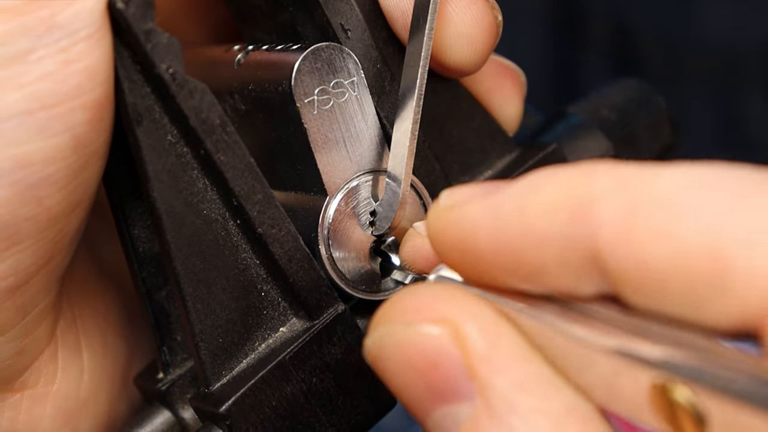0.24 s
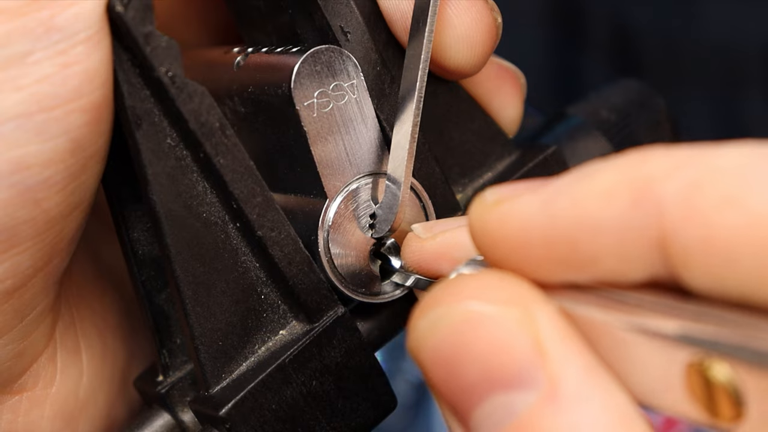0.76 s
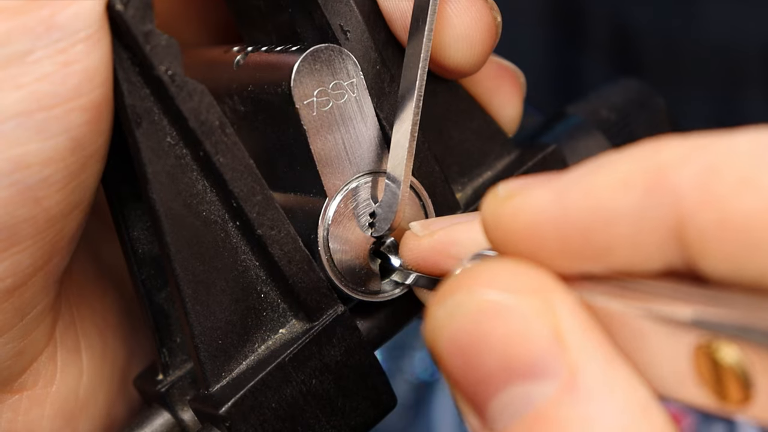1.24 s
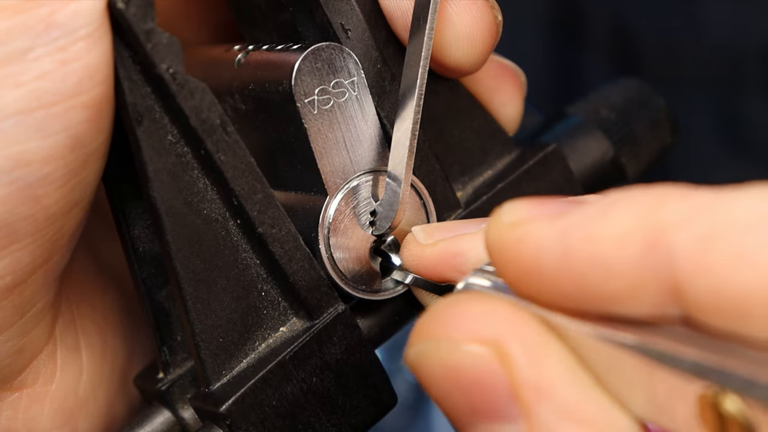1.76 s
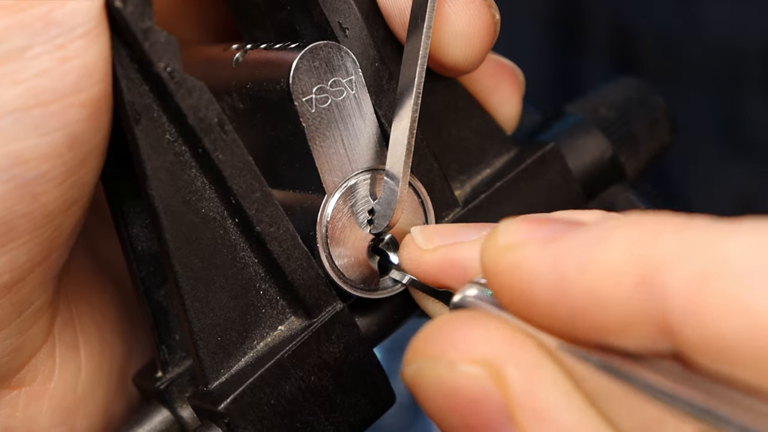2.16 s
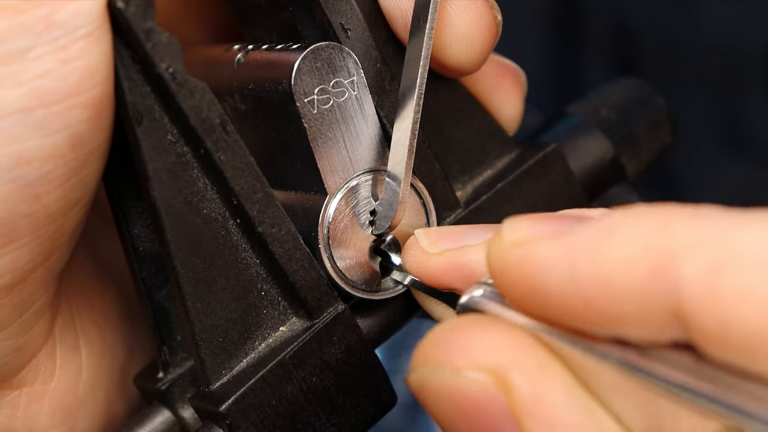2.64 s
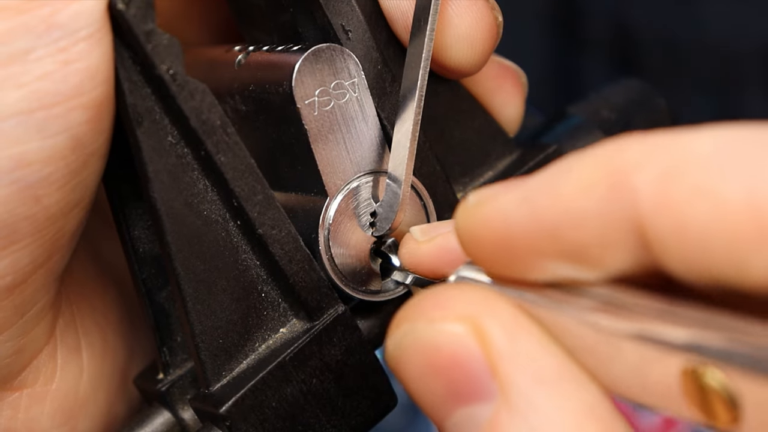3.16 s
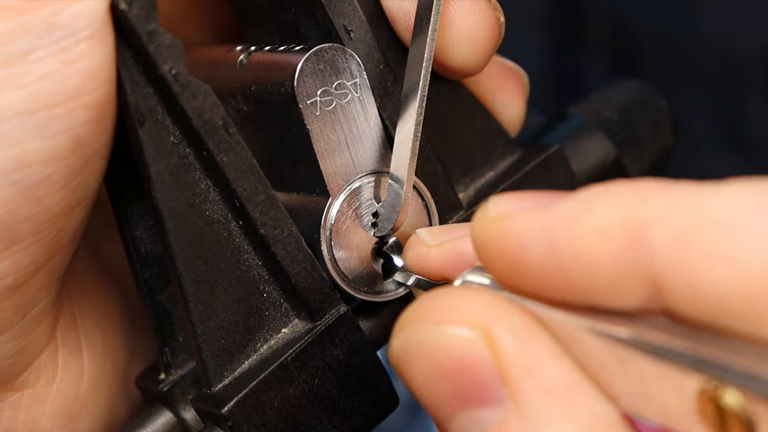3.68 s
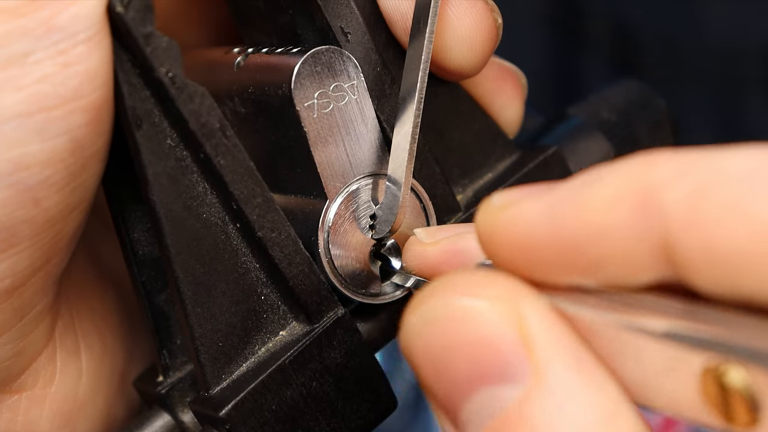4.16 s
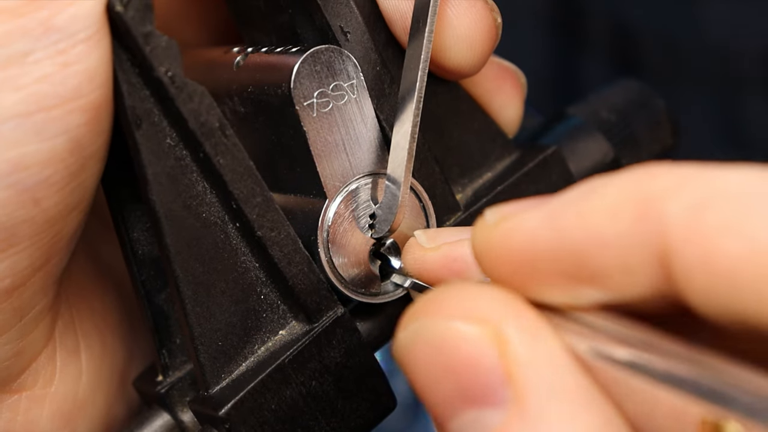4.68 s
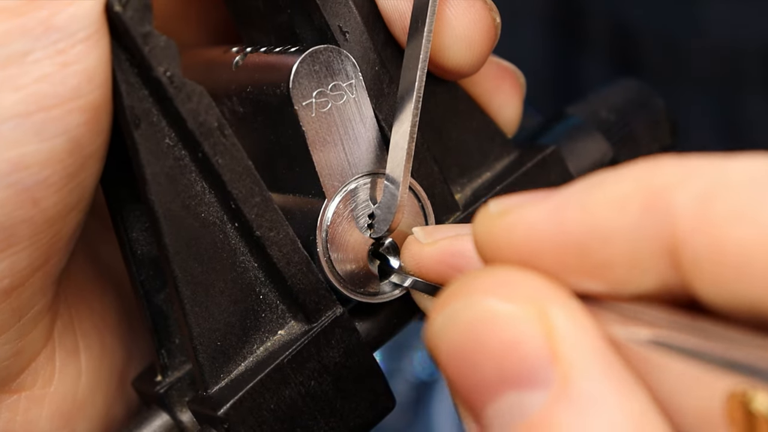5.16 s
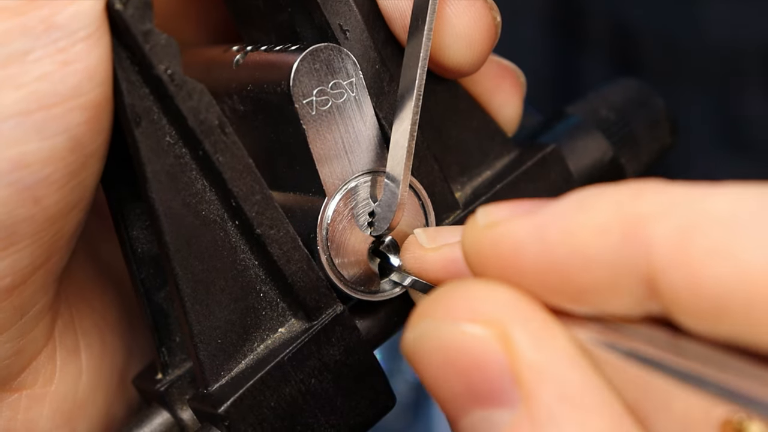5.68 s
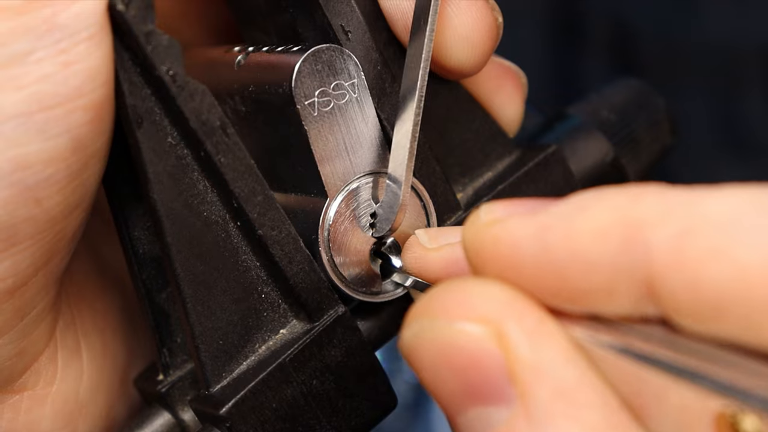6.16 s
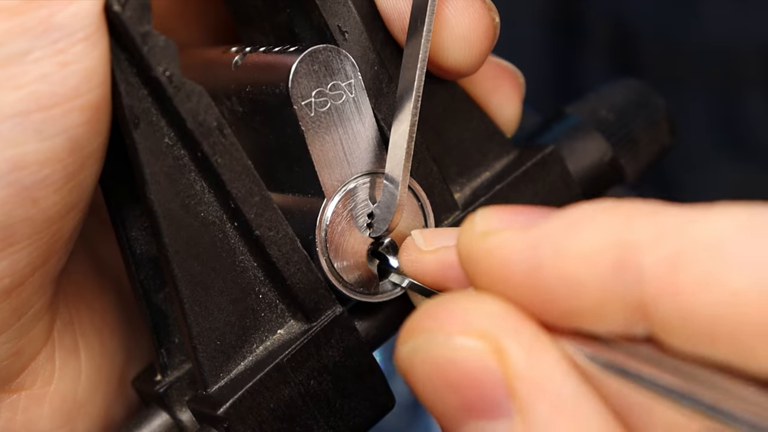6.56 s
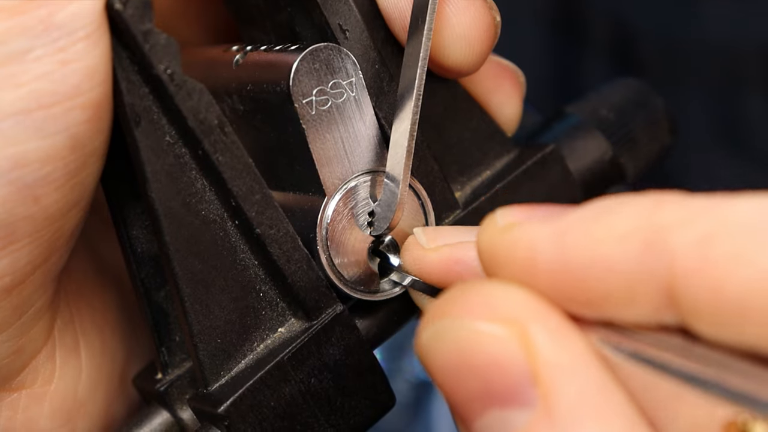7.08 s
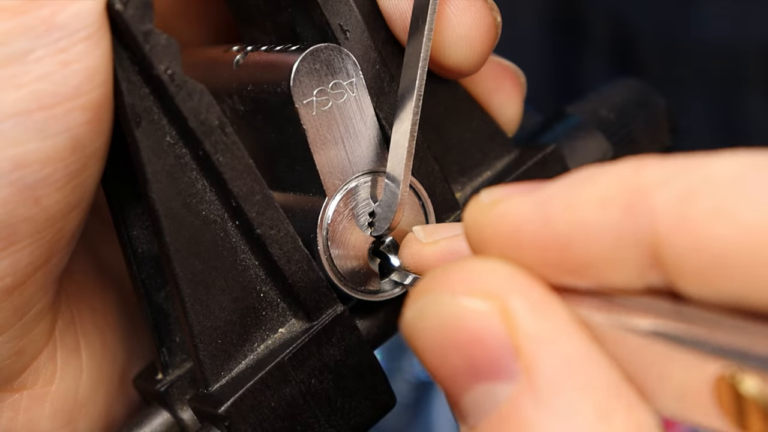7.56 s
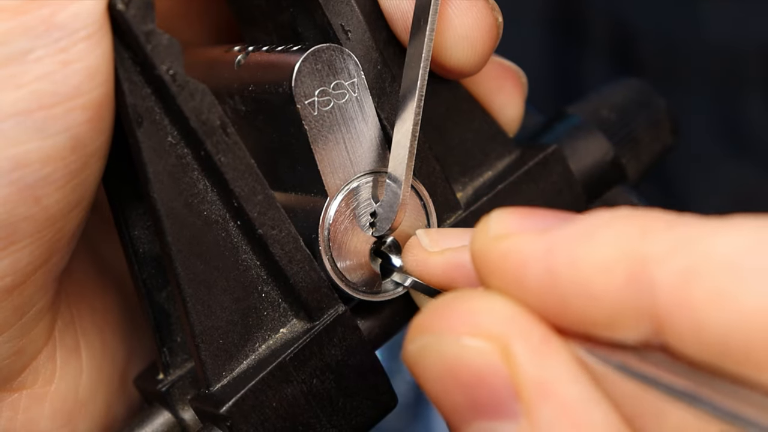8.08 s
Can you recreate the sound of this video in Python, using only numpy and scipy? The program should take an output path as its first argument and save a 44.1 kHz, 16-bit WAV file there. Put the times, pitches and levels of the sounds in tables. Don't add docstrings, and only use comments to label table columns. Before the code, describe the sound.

Very close, dry metal clicks from a pick and tension wrench in a small lock held in a vice. Faint ticks lead to one hard, bright snap with a brief metallic ring; more light ticks and a quiet stretch follow, then a second, softer snap and a few last clicks. A steady low ventilation hum fills the small room.

```python
import sys
import numpy as np
from scipy import signal
from scipy.fft import rfft, irfft, next_fast_len
from scipy.io import wavfile

SR = 44100
rng = np.random.default_rng(int(sys.argv[2]) if len(sys.argv) > 2 else 0)


def nominal_scale(level):
    x = np.asarray(level, float) / 20
    return 10 ** x


def pcm_store(signal):
    levels = np.round(np.clip(np.atleast_2d(signal), -1, 1) * 32767)
    wavfile.write(sys.argv[1], SR, levels.astype(np.int16).T)


N = 367353

LEFT_LAG_S = .00013
HISS_EDGE_HZ, TOP_HZ = 15880, 16300
LEFT_RIGHT = np.array([[1], [-1]])


def at_hz(points, hz):
    points_hz, values = np.array(points).T
    return np.interp(np.log(hz), np.log(points_hz), values)


def add(out, s, sound):
    i = round(s * SR)
    out[:, i:i + sound.shape[1]] += sound[:, :N - i]


def band_pass(order, low_hz, high_hz, noise):
    sos = signal.butter(order, [low_hz, high_hz], "band", fs=SR, output="sos")
    return signal.sosfilt(sos, noise)


def ventilation():
    # (frequency [Hz], level [dB])
    air_colour = [(15, -64.5), (25, -19.5), (102, -17.5), (190, -8), (326, -13), (700, -19.5),
                  (2400, -26.5), (8140, -43)]
    # (frequency [Hz], width [Hz], lift [dB])
    duct = [(142, 30, 11), (215, 22, 9), (247, 16.3, 6.5), (340, 25, -9), (354, 23, 5.5), (414, 11.5, 2.5),
            (459, 98, 8), (457.5, 11, 3.5), (533, 16, -5), (597, 40, 5), (1041, 76, 4.5), (2330, 48, 6.5),
            (2475, 74, 7.5)]
    # (frequency [Hz], width [Hz], lift [dB])
    capsule = [(11600, 500, 5.5), (13300, 700, 0), (14700, 900, 4.5)]
    # (frequency [Hz], correlation [-1 to 1])
    likeness = [(60, 0.95), (150, .99), (320, 0.93), (630, 0.85), (880, .5), (1700, .3), (3300, .07),
                (15000, .07)]
    # (frequency [Hz], left minus right [dB])
    lean = [(60, -1.5), (130, 1.5), (290, 1.5), (640, 2.0), (1410, -1.5), (3100, -4.5), (6820, 1.5),
            (15000, -2)]
    size = next_fast_len(N)
    hz = np.maximum(np.fft.rfftfreq(size, 1 / SR), 10)
    colour_db = at_hz(air_colour, hz)
    for centre_hz, width_hz, lift_db in duct + capsule:
        colour_db = colour_db + lift_db / (1 + (2 * (hz - centre_hz) / width_hz) ** 2)
    alike = np.clip(at_hz(likeness, hz), -1, 1)
    mid, side = rfft(rng.standard_normal((2, size)), axis=1)
    ports = np.sqrt(1 + alike) * mid + LEFT_RIGHT * np.sqrt(1 - alike) * side
    ports = ports * nominal_scale(colour_db + LEFT_RIGHT * at_hz(lean, hz) / 2)
    ports = ports * np.exp(-1j * np.pi * LEFT_RIGHT * hz * LEFT_LAG_S)
    air = irfft(ports * (hz < HISS_EDGE_HZ), size, axis=1)[:, :N]
    return nominal_scale(-45) * air / np.sqrt(np.mean(air ** 2))


def tone(start, stop, start_hz, stop_hz, db):
    fade_s = 0.14
    t = np.arange(N) / SR - LEFT_LAG_S * np.array([[1], [0]])
    fade = np.clip(np.minimum(t - start, stop - t) / fade_s + 1, 0, 1)
    glide_hz_per_s = (stop_hz - start_hz) / (stop - start)
    cycles = start_hz * (t - start) + glide_hz_per_s * (t - start) ** 2 / 2
    return np.sqrt(2) * nominal_scale(db) * fade * np.sin(2 * np.pi * cycles)


def fan():
    start_hz, sag_hz_per_s = 213.5, .55
    return tone(0, N / SR, start_hz, start_hz - sag_hz_per_s * N / SR, -53)


def far_motors():
    # (start [s], stop [s], start pitch [Hz], stop pitch [Hz], level [dB rms])
    runs = [
        (0.0, 3.3, 41, 39.5, -65.5),
        (5.2, 5.52, 155, 142, -49),
        (5.721, 5.95, 67, 63.6, -60.5),
        (6.079, 8.4, 63.3, 61.16, -56),
    ]
    return sum(tone(*run) for run in runs)


def mains():
    # (multiple of 120 Hz [-], level [dB rms])
    overtones = [(5, -69), (6, -80), (7, -70), (11, -78.5), (12, -83)]
    t = np.arange(N) / SR
    buzz = 0
    for multiple, db in overtones:
        waver_db = np.interp(t, np.arange(26) / 3, 2.0 * rng.standard_normal(26))
        buzz = buzz + np.sqrt(2) * nominal_scale(db + waver_db) * np.sin(2 * np.pi * round(multiple) * 120 * t)
    return buzz


def ring(force, hz, t60):
    r, w = nominal_scale(-60 / (t60 * SR)), 2 * np.pi * hz / SR
    return signal.lfilter([0, np.sin(w)], [1, -2 * r * np.cos(w), r * r], force)


def thud(db, hz, t60):
    push = np.zeros(8000)
    push_size = int(SR / hz / 2)
    push[:push_size] = np.hanning(push_size) * 4 * hz / SR
    return nominal_scale(db) * np.tile(ring(push, hz, t60), (2, 1))


def struck(hz, t60, contact_ms, size):
    plug_hz, plug_width_hz, plug_turn = 6600, 1100, 1.5
    t = np.arange(size) / SR
    swell = 1 - np.exp(-(t * 1000 / max(contact_ms, .05)) ** 2)
    late = plug_turn * np.exp(-((hz - plug_hz) / plug_width_hz) ** 2) * np.array([[0], [1]])
    return swell * nominal_scale(-60 * t / t60) * np.sin(2 * np.pi * hz * t - late)


def crack(low_hz, top_hz, t60, size):
    noise = rng.standard_normal((3, size)) * nominal_scale(-60 * np.arange(size) / SR / t60)
    return band_pass(3, low_hz, top_hz, 0.78 * (noise[:2] + noise[2]))


def hand_bump():
    # (level [dB], pitch [Hz], decay t60 [s])
    palm = (-32.5, 140, 0.088)
    out = np.zeros((2, N))
    add(out, 8.0105, thud(*palm))
    return out


def knock_and_shank(knock_db, shank_db):
    # (lowest mode [Hz], highest mode [Hz], decay t60 [s], level [dB])
    parts = [
        (1450, 2850, 0.011, 3.5),
        (3300, 5000, 0.0081, 6),
    ]
    sound = 0
    for (low_hz, high_hz, t60, part_db), db in zip(parts, [knock_db, shank_db]):
        pitches = np.geomspace(low_hz, high_hz, 6) * (1 + 0.0096 * rng.standard_normal(6))
        for k, hz in enumerate(pitches):
            sense = (-1) ** k
            contact_ms = rng.uniform(0.1, 2.2)
            sound = sound + sense * nominal_scale(db + part_db) * struck(hz, t60, contact_ms, size=1500)
    return sound


def ticks():
    # (ring [Hz], sizzle against the shank [dB], sizzle from [Hz], sizzle up to [Hz])
    pins = [(5900, 3, 9100, 9600), (6800, -4, 5200, 10400), (6870, -0.5, 6700, 17000),
            (8260, -2.5, 5400, 14000), (9860, 2.5, 7100, 14000)]
    # (time [s], ring [dB], vice knock [dB re ring], pick shank [dB re
    touches = [
        [(4.8097, -62, 10, -8.5), (5.3294, -64, 19.5, -3), (8.0076, -34.5, -3.5, -14)],
        [(1.496, -44, -3, -10.5), (6.2761, -44.5, -2.5, -6.5)],
        [(1.724, -45, -4.5, -7.5), (2.4044, -55, 5, -10), (2.611, -37.5, -11, -19), (3.048, -27, -16.5, -24),
         (6.6328, -35.5, -14, -4)],
        [(0.0704, -45.5, -8, -11), (2.418, -40.5, -9, -14)],
        [(3.2713, -41, -14, -10), (6.439, -47.5, -10, -7.5), (8.2629, -33.5, -11, -18.5)],
    ]
    lean_db = -3.5
    out = np.zeros((2, N))
    for (ring_hz, sizzle_db, sizzle_hz, top_hz), rows in zip(pins, touches):
        for s, ring_db, knock_db, shank_db in rows:
            pin = struck(ring_hz, 0.0073, 0.25, size=1500)
            sizzle = nominal_scale(shank_db + sizzle_db + 12.0) * crack(sizzle_hz, top_hz, 0.012, size=1500)
            sound = pin + sizzle + knock_and_shank(knock_db, shank_db)
            add(out, s, nominal_scale(ring_db + lean_db / 2 * LEFT_RIGHT) * sound)
    return out


def wrench_song():
    # (frequency [Hz], decay t60 [s], level [dB])
    bending = [(6850, 0.24, -42.5), (7250, 0.2, -50)]
    song = 0
    for hz, t60, db in bending:
        for detune in [.987, 1, 1.009]:
            song = song + nominal_scale(db) * struck(hz * detune, t60, 5, size=16000)
    return song


def rattled(sound, ms, db):
    own_share = 0.93
    age = np.arange(SR // 50) / SR * 1000
    jolts = rng.choice([-1, 1], (3, len(age)))
    bounces = (jolts[2] + own_share * jolts[:2]) * np.clip(age - .8, 0, 1) / (1 + (age / ms) ** 10)
    bounces *= nominal_scale(db) / np.sqrt(np.sum(bounces ** 2, axis=1, keepdims=True))
    bounces[:, 0] = 1
    for _ in range(6):
        spectrum = rfft(bounces, axis=1)
        bounces = irfft(spectrum / np.abs(spectrum), len(age), axis=1) * (age < 1.15 * ms)
    return nominal_scale(5.5) * signal.fftconvolve(sound, bounces, axes=1)[:, :sound.shape[1]]


def snaps():
    snap_s = [
        2.1258,
        6.0049,
    ]
    # (peak [dB], contact build-up [ms], crack [dB], spring rattle [ms], rattle [dB])
    blows = [
        (-2, 0.1, -8.5, 5.4, -3.5),
        (-1, 1.1, -17.5, 5.2, -4),
    ]
    # (frequency [Hz], decay t60 [s], left [dB], right [dB])
    hard_pin = [(1100, .014, -25, -25), (1340, .012, -25, -24), (2070, .012, -21, -18),
                (2710, .012, -21, -17), (3410, .01, -24, -20), (4440, .006, -23, -20),
                (5950, .005, -10, -8), (6530, .007, -7, -4), (7050, .006, -10, -6), (9100, .004, -22, -17),
                (10960, .003, -16, -13), (12880, .003, -13, -13), (13720, .0045, -1, -2),
                (15580, .004, -9, -9)]
    # (frequency [Hz], decay t60 [s], left [dB], right [dB])
    soft_pin = [(1800, .01, -29, -28), (2250, .01, -22, -20), (2550, .01, -20, -18), (3280, .01, -22, -16),
                (3850, .008, -23, -20), (4730, .006, -30, -25), (5780, .006, -30, -28),
                (6790, .009, -9, -3), (8140, .012, -23, -16), (9560, .004, -30, -23),
                (12900, .004, -17, -14), (14000, .005, -15, -14), (15100, .004, -15, -15)]
    # (level [dB], pitch [Hz], decay t60 [s])
    vice_thuds = [
        (-25.5, 205, 0.12),
        (-28, 440, .03),
    ]
    # (level [dB], pitch [Hz], decay t60 [s])
    jaw = (-28.5, 507, 0.025)
    out = np.zeros((2, N))
    for s, blow, vice, modes in zip(snap_s, blows, vice_thuds, [hard_pin, soft_pin]):
        peak_db, contact_ms, crack_db, rattle_ms, rattle_db = blow
        pin = 0
        for k, (hz, t60, left_db, right_db) in enumerate(modes):
            strength = (-1) ** k * nominal_scale(np.array([[left_db], [right_db]]))
            pin = pin + strength * struck(hz, t60, contact_ms + 1500 / hz, size=3000)
        build_up = np.minimum(np.arange(3000) / SR * 1000 / contact_ms, 1)
        pin = pin + nominal_scale(crack_db) * crack(2070, TOP_HZ, 0.011, size=3000) * build_up
        add(out, s, nominal_scale(peak_db) * rattled(pin, rattle_ms, rattle_db))
        add(out, s + 0.003, thud(*vice))
    add(out, snap_s[0] + 0.0016, thud(*jaw))
    add(out, snap_s[0], wrench_song())
    return out


def space(x):
    # (frequency [Hz], t60 [s])
    room_t60 = [(500, 0.27), (3000, 0.3), (7000, 0.27), (15000, 0.18)]
    scatter_s, scatter_db, room_db = .0045, -15, -18
    t = np.arange(SR // 2) / SR
    near = rng.standard_normal((2, len(t))) * (rng.random((2, len(t))) < .15)
    near *= np.clip(t * 1000, 0, 1) / (1 + (t / scatter_s) ** 8)
    near /= np.sqrt(np.sum(near ** 2, axis=1, keepdims=True))
    edges, tail = np.geomspace(250, HISS_EDGE_HZ, 9), 0
    for low, high in zip(edges, edges[1:]):
        band = band_pass(2, low, high, rng.standard_normal((2, len(t))))
        tail = tail + band * nominal_scale(-60 * t / at_hz(room_t60, np.sqrt(low * high)))
    tail = tail * np.clip(t / .008, 0, 1) / np.sqrt(SR / 40)
    response = nominal_scale(scatter_db) * near + nominal_scale(room_db) * tail
    return x + signal.fftconvolve(x, response, axes=1)[:, :N]


def scene():
    hum = fan() + far_motors() + mains()
    lock = space(snaps() + ticks() + hand_bump())
    return lock + ventilation() + hum * nominal_scale(.6 * LEFT_RIGHT)


def top_cut(x):
    return signal.sosfilt(signal.butter(12, 16750, fs=SR, output="sos"), x)


def record(dry):
    heard = signal.sosfilt(signal.butter(4, 36, "high", fs=SR, output="sos"), dry)
    heard = signal.sosfilt(signal.cheby2(10, 50, TOP_HZ + 200, fs=SR, output="sos"), heard)
    return top_cut(np.clip(heard, -1, 1))


dry = scene()
out = record(dry)
pcm_store(out)
```